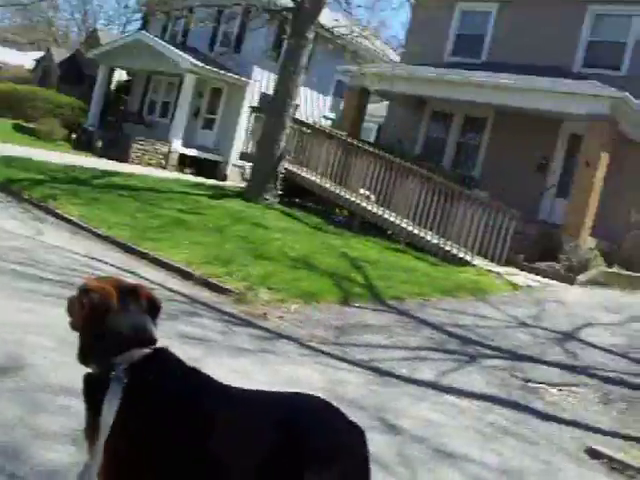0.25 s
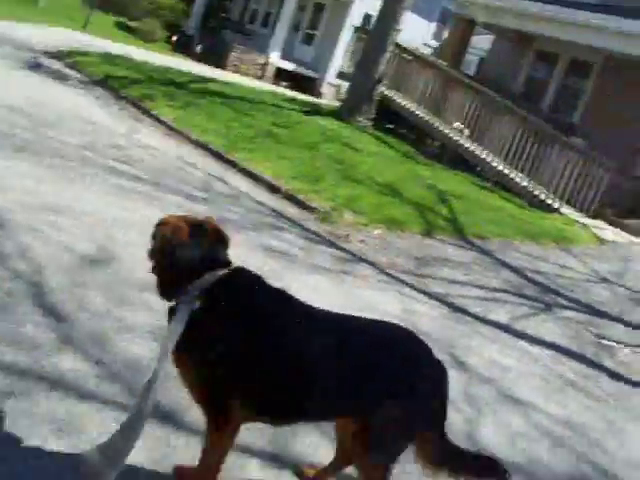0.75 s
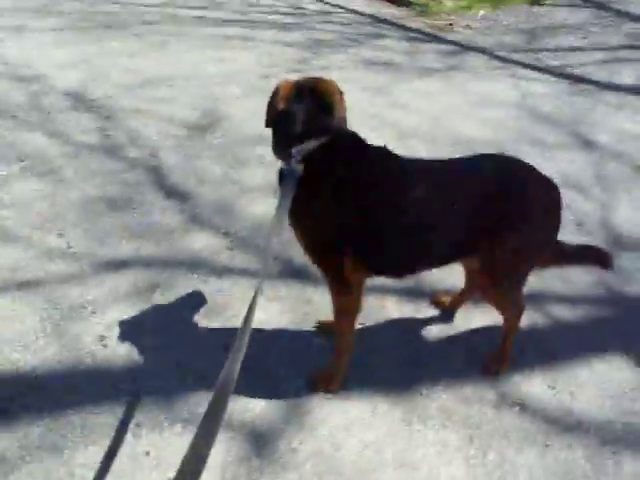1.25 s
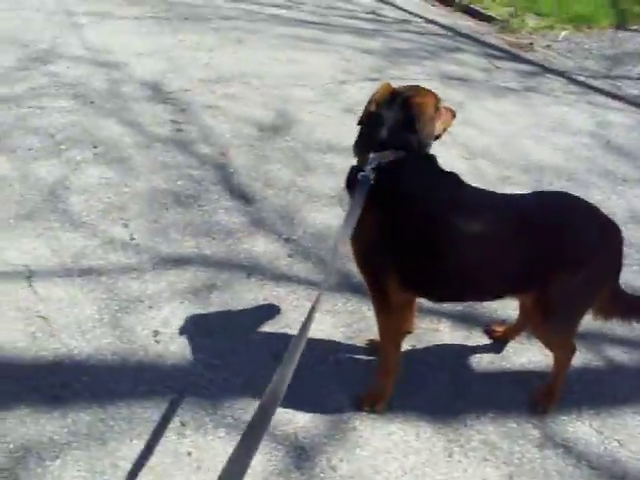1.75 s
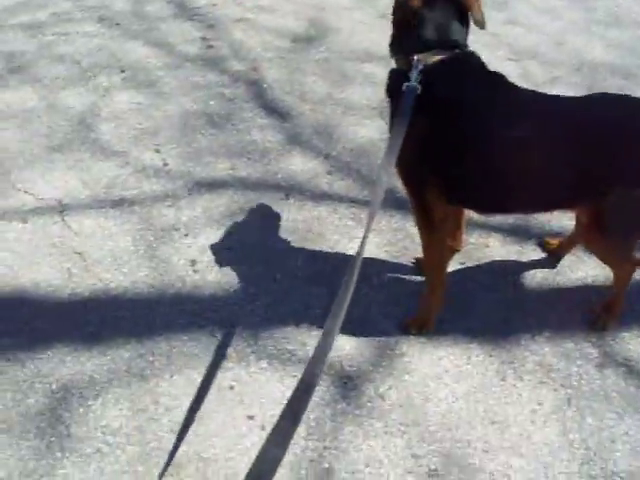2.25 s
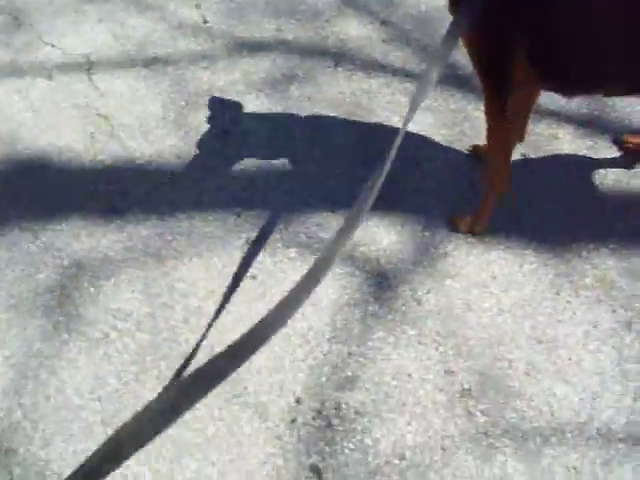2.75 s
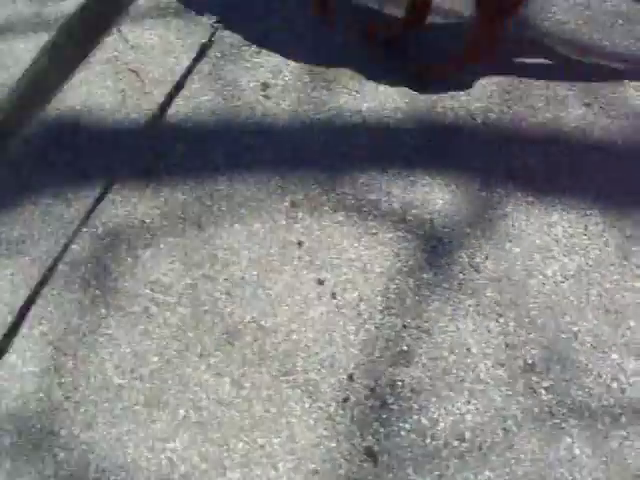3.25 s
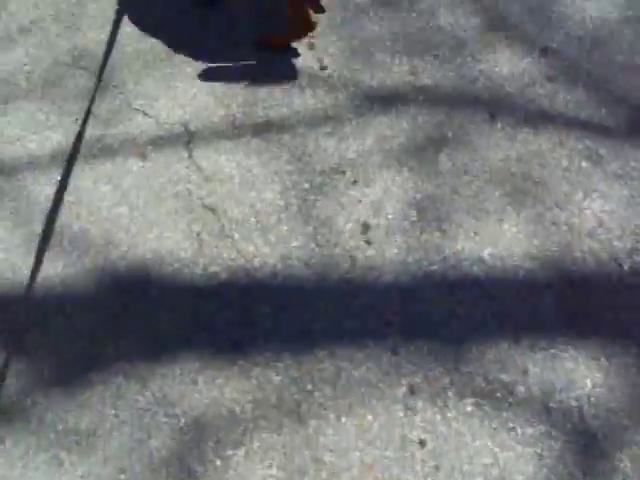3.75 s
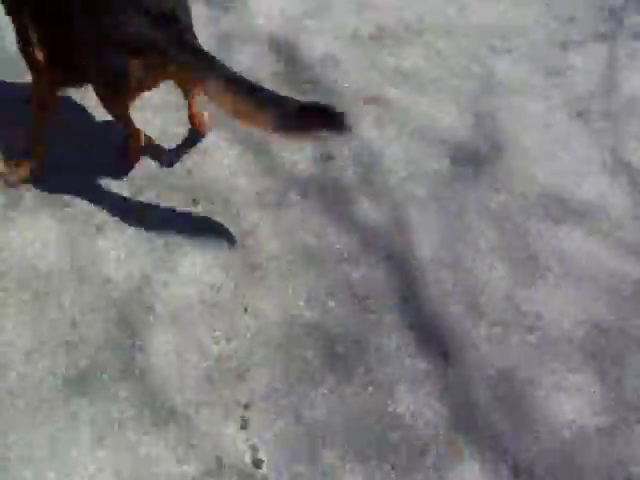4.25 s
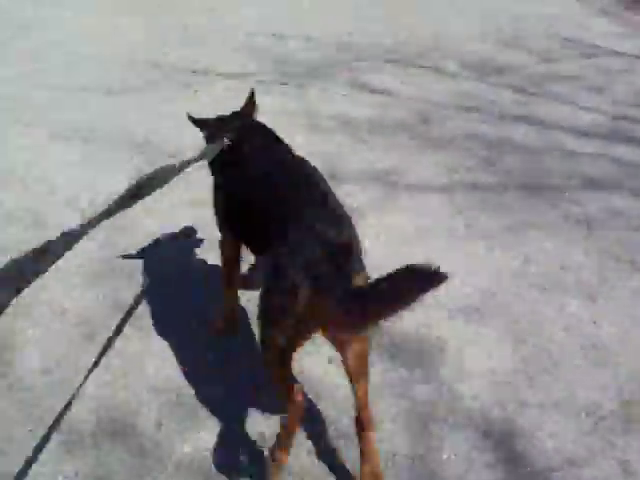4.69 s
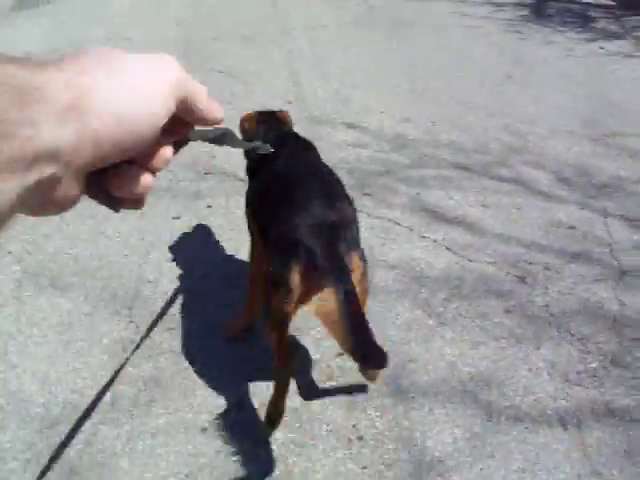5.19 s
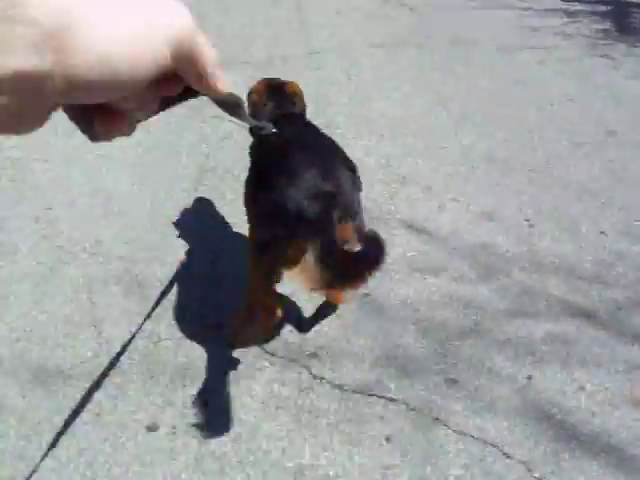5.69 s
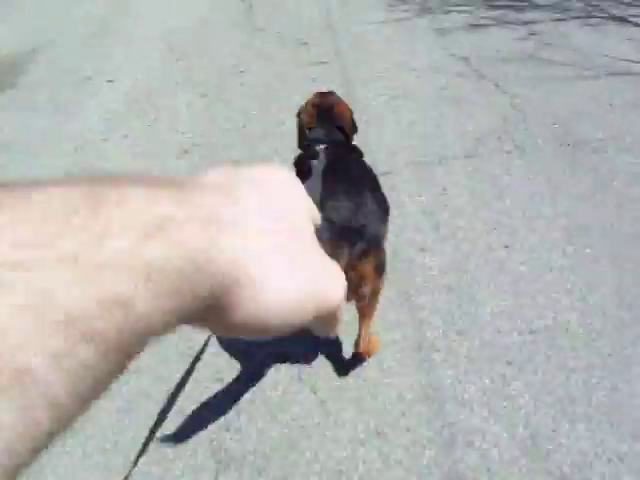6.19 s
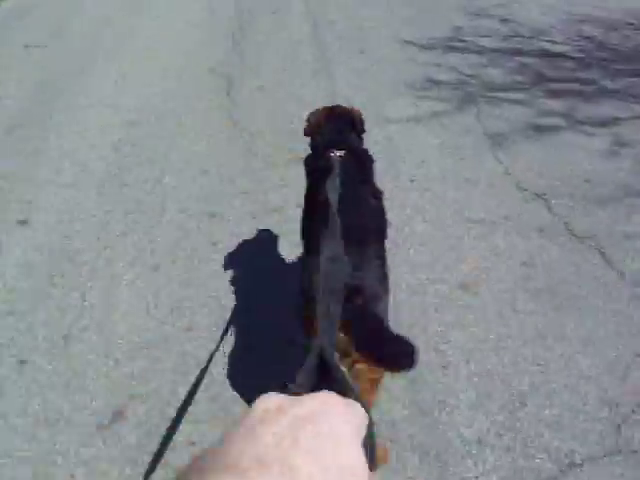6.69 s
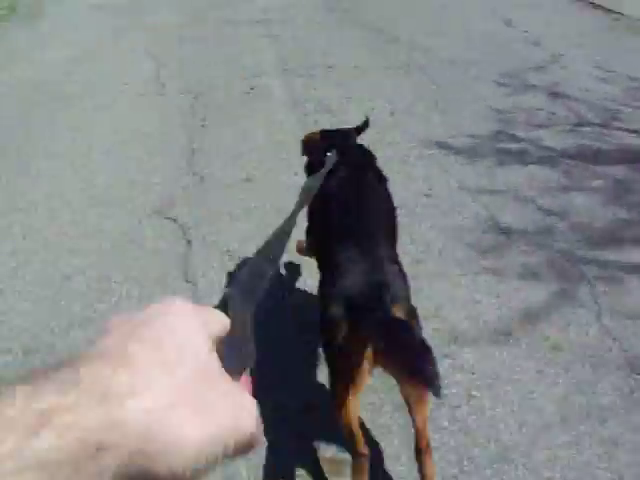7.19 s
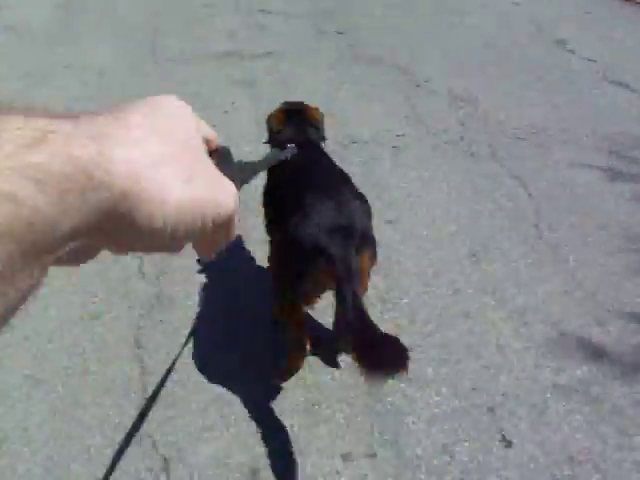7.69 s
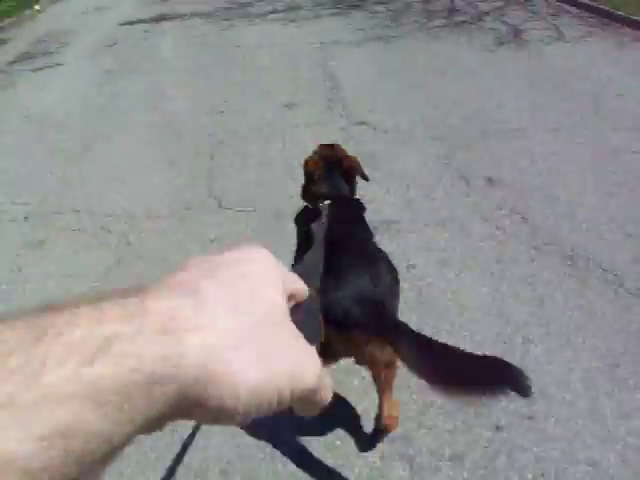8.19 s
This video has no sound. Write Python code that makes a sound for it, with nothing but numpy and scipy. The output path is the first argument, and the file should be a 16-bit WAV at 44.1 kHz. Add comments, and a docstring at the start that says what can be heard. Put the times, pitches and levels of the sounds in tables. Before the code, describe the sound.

Outdoor birdsong and leash rustle, a sharp skateboard clack on asphalt, shoe scuffs, then rough wheels accelerating with buffeting wind.

```python
"""Skateboard towed by a dog

Two songbirds whistle in gliding tones over soft street noise and the wavering hum of a distant engine.
Close to a hand-held camera, rubbed noise makes a leash rustle and short ringing tones make it click.
The board slaps down twice, with small bounces, as ringing deck tones and bursts of noise; a shoe scuffs.
Then tiny random impacts make the wheels grind over asphalt grit, louder with speed, and wind buffets."""
import sys
import numpy as np
from scipy import signal
from scipy.fft import rfft, irfft
from scipy.io import wavfile
from scipy.ndimage import uniform_filter1d

SR = 44100
rng = np.random.default_rng(int(sys.argv[2]) if len(sys.argv) > 2 else 0)


def store_wav(level_fs):
    """Save 16-bit WAV to argv[1]."""
    pcm = np.round(np.clip(np.atleast_2d(level_fs), -1, 1) * 32767)
    wavfile.write(sys.argv[1], SR, pcm.T.astype(np.int16))


N = 372204  # length of the scene in samples

# tone of fine rubbing, for the leash and for the tyre-like hiss of the wheels: f/Hz, level/dB
RUSTLE_COLOUR = [(400, 4.5), (1500, 7.5), (2600, 2), (3800, 2), (5200, -0.5), (6800, -1), (8500, 0.5)]
# the board slaps down, bounces and settles: t/s, level/dB, lowest bending tone under that load f/Hz,
# rattle level/dB, ring length (share of full length), slap level/dB; the last two levels are relative
LANDINGS = [(3.0055, -5, 309, -9.5, 0.73, 5), (3.047, -33, 328, 6, 1, -12), (3.071, -40, 333, -9, 0.94, -7),
            (3.106, -58, 330, 17.5, 0.68, 3), (3.122, -46.5, 328, 7.5, 1, -12),
            (3.1651, -8, 337.6, -16, 0.6, -23.5), (3.1693, -9.5, 315, -11, 0.12, -30.5),
            (3.187, -28, 360, -3.5, 0.32, -17)]
ROLL_START_S = 3.33


def undb(db):
    """Turn decibels into a gain."""
    return 10 ** (np.asarray(db) / 20)


def unit(x):
    """Scale a sound to an average (rms) level of 1."""
    return x / np.sqrt(np.mean(x ** 2))


def curves(table):
    """Draw straight lines between the rows of a table, giving each column at every sample."""
    s, *columns = np.transpose(table)
    return [np.interp(np.arange(N) / SR, s, column) for column in columns]


def since(start):
    """Stay silent before the start, then fade in over 0.28 s."""
    return np.clip((np.arange(N) / SR - start) / 0.28, 0, 1)


def add(out, start, sound):
    """Mix a sound in at a time in seconds, cutting off what falls outside the scene."""
    i = int(start * SR)
    a, b = max(i, 0), min(i + len(sound), N)
    if b > a:
        out[a:b] += sound[a - i:b - i]


def colour(x, points, size=4096):
    """Filter a sound to a spectrum of (Hz, dB) points, without any sound ahead of its cause."""
    hz, db = np.transpose(points)
    grid = np.maximum(np.arange(size // 2 + 1) * SR / size, 1)
    gain = undb(np.interp(np.log(grid), np.log(hz), db))
    # folding the cepstrum forward in time gives a minimum-phase filter
    cepstrum = irfft(np.log(gain))
    cepstrum[1:size // 2] *= 2
    cepstrum[size // 2 + 1:] = 0
    response = irfft(np.exp(rfft(cepstrum)))
    return signal.fftconvolve(x, response)[:len(x)]


def resonance(x, hz, width_hz):
    """Pick out a narrow band, with gain 1 at its centre."""
    return signal.lfilter(*signal.iirpeak(hz, hz / width_hz, fs=SR), x)


def walk(rate):
    """Wander smoothly at random, with rms 1 and about rate turns a second."""
    k = max(int(SR / rate), 1)
    steps = np.repeat(rng.standard_normal(N // k + 1), k)
    return unit(uniform_filter1d(steps, k)[:N])


def grains(rate, spread_db):
    """Scatter tiny random impacts, about rate a second, a few larger than the rest."""
    hit = rng.random(N) < rate / SR
    size = undb(spread_db * np.minimum(rng.exponential(size=N), 4))
    sign = rng.choice([-1, 1], N)
    return unit(hit * size * sign / np.sqrt(rate))


def plateaus(table, edge_s):
    """Make flat-topped rises with sloping edges from (s, length s, height) rows."""
    t = np.arange(N) / SR
    return sum(height * np.clip(.5 + np.minimum(t - s, s + length - t) / edge_s, 0, 1)
               for s, length, height in table)


def swell(count):
    """Rise and fall once, like half a sine wave."""
    return np.sin(np.linspace(0, np.pi, count))


def strokes(table):
    """Make pressure that swells and fades once for each (s, length s, dB) row."""
    pressure = np.zeros(N)
    for s, length, db in table:
        add(pressure, s, undb(db) * swell(int(length * SR)))
    return pressure


def pace():
    """Give the board's speed as a share of cruising speed; it sags and surges as the dog pulls."""
    # speed of the board: t/s, speed/(m/s)
    speed_points = [(3.5, 0.36), (3.85, 0.71), (4.35, 0.93), (4.63, 0.83), (4.85, 1.47), (5.12, 1.46),
                    (5.35, 2.24), (5.52, 2.23), (6.2, 3.16), (6.85, 3.2), (7.2, 2.91), (7.68, 3.4),
                    (7.86, 2.89), (8.12, 3.28), (8.44, 2.93)]
    cruise_m_s = 3
    return np.maximum(curves(speed_points)[0] / cruise_m_s, .01)


def street():
    """Filter noise into soft outdoor air and add two wavering harmonics of a distant engine."""
    # loudness of the outdoor noise, which drops after the board lands: t/s, level/dB
    air_levels = [(0, -43), (.6, -40.5), (1.1, -37), (2.4, -38), (3.0, -36.5), (3.04, -54.5), (3.22, -58),
                  (3.35, -62.5), (8.44, -67)]
    # tone of the outdoor noise: f/Hz, level/dB
    air_colour = [(12, -34), (20, -4.5), (90, -2), (164, -9), (437, -17.5), (903, -18), (1610, -25.5),
                  (1870, -24.5), (2860, -30), (3500, -28), (4490, -33.5), (7060, -40.5), (8000, -49),
                  (10400, -68), (17600, -120)]
    # engine hum: t/s, second harmonic relative level/dB, third harmonic relative level/dB
    engine_levels = [(0, -47, -47.5), (.3, -39.5, -54), (1.2, -34, -61), (1.75, -30.5, -40),
                     (1.95, -35, -46), (2.2, -27, -39), (2.45, -38.5, -37.5), (2.65, -33, -41.5),
                     (3.0, -60, -39), (3.06, -77, -72)]
    engine_hz = 43.5  # firing rate
    air_db, = curves(air_levels)
    air = unit(colour(rng.standard_normal(N), air_colour)) * undb(air_db + 1.3 * walk(5.9))
    second_db, third_db = curves(engine_levels)
    phase = 2 * np.pi * np.cumsum(engine_hz * (1 + 0.011 * walk(14))) / SR
    hum = undb(second_db) * np.sin(2 * phase) + undb(third_db) * np.sin(3 * phase)
    return air + np.sqrt(2) * hum * undb(-5.0 + 2 * walk(16))


def whistle(shape):
    """Glide a pure tone along (s, Hz, dB) points, with a small random shift of pitch."""
    s, hz, db = np.transpose(shape)
    t = np.arange(s[0], s[-1], 1 / SR)
    pitch = np.interp(t, s, hz) * (1 + 0.005 * rng.standard_normal())
    return np.sin(2 * np.pi * np.cumsum(pitch) / SR) * undb(np.interp(t, s, db))


def song():
    """Time a run of whistles that hurries a little and grows louder over its first notes."""
    note_count, start_s, gap_s, hurry_s_per_note = 12, -0.023, .1935, 0.00089
    song_db, soft_start_db, crescendo_s = -33.5, -8, 0.93
    k = np.arange(note_count)
    elapsed = k * (gap_s - hurry_s_per_note * k / 2)
    levels_db = song_db + soft_start_db * np.maximum(1 - elapsed / crescendo_s, 0)
    return zip(start_s + elapsed, levels_db)


def scatter(note, fade):
    """Spread a sound over many random paths whose strength follows a fade."""
    paths = fade * rng.standard_normal(len(fade))
    return signal.fftconvolve(note, paths / np.linalg.norm(paths))


def birds():
    """Sing rising whistles and a second bird's slurs, echoed by houses and scattered by trees and road."""
    # one rising whistle: t from mid sweep/s, f/Hz, relative level/dB
    sweep = [(-.075, 1680, -25), (-.056, 1750, -12.5), (-.036, 1810, -12.5), (-.024, 1950, -5),
             (-.012, 2220, -3.5), (-.005, 2600, -7.5), (0, 3060, -4), (.012, 3420, 2), (0.021, 3740, -4.5),
             (.027, 4100, -12)]
    # the second bird's short slurs: t/s, length/s, start f/Hz, end f/Hz, level/dB
    slurs = [(0.47, 0.021, 4450, 5380, -54), (0.49, 0.02, 4280, 5500, -49), (0.503, .036, 4630, 4200, -47),
             (0.577, 0.038, 3450, 2630, -46), (1.349, .05, 4390, 4050, -51),
             (1.649, 0.029, 3900, 2754, -41), (2.536, 0.022, 4640, 4080, -42)]
    # porches and house fronts that echo the birds: delay/s, relative level/dB
    houses = [(.011, -7.5), (.034, -7), (.083, -13)]
    # straight path, which weakens once the camera tips down to the road: t/s, relative level/dB
    direct_levels = [(0, -7), (.15, 2), (.55, 0), (.76, 3), (.95, 2.5), (1.12, -2), (1.7, -2), (2.1, -7)]
    note_spread_db, scatter_db, far_db = 1.5, -1, -14
    trees_t60_s, far_t60_s, house_t60_s = 0.08, 0.7, 0.035  # times to fade by 60 dB
    t = np.arange(SR // 2) / SR
    notes = []
    for s, db in song():
        gain = undb(db + note_spread_db * rng.standard_normal())
        notes.append((s + sweep[0][0], gain * whistle(sweep)))
    for s, length, start_hz, end_hz, db in slurs:
        slur = whistle([(0, start_hz, db), (length, end_hz, db)])
        notes.append((s, slur * swell(len(slur))))
    open_fade = undb(-60 * t / trees_t60_s) + undb(far_db - 60 * t / far_t60_s)
    house_fade = undb(-60 * t / house_t60_s)
    direct, echoes = np.zeros((2, N))
    for s, note in notes:
        add(direct, s, note)
        # the microphone moves, so each note arrives by a new set of near and far paths
        add(echoes, s, undb(scatter_db) * scatter(note, open_fade))
        for delay, db in houses:
            add(echoes, s + delay, undb(db) * scatter(note, house_fade))
    return direct * undb(curves(direct_levels)[0]) + echoes


def wind():
    """Buffet the microphone with low noise from eddies, harder with speed and in gusts."""
    # gusts on the microphone: t/s, length/s, extra level/dB
    gusts = [(4.5, 0.063, 14), (4.84, 0.37, 2), (5.32, 0.041, 6), (5.77, 0.079, 5.5), (6.17, 0.12, 5),
             (6.38, 0.15, 5.5), (6.62, 0.096, 6.5), (7.01, 0.074, 6), (7.72, 0.07, 5.5), (8.25, 0.031, 12)]
    # tone of the wind: f/Hz, level/dB
    wind_colour = [(15, -14.5), (35, 2), (70, 3.5), (110, 0.5), (200, -16), (500, -52.5)]
    cruise_db, growth_db = -25, 47  # level at cruising speed; growth per tenfold speed
    gust_edge_s = 0.019
    wind_db = cruise_db + growth_db * np.log10(pace()) + plateaus(gusts, gust_edge_s)
    eddies = unit(colour(rng.standard_normal(N), wind_colour))
    return eddies * undb(wind_db + 0.7 * walk(15)) * since(ROLL_START_S)


def leash():
    # the leash slides through the hand: t/s, length/s, level/dB, rasp f/Hz (set by the pull)
    rubs = [(0.171, 0.12, -48, 6000), (0.468, 0.15, -47.5, 1462), (0.71, 0.11, -38, 3500),
            (0.789, 0.3, -37, 2970), (0.918, 0.11, -43, 3430), (1.217, 0.22, -43.5, 1755),
            (2.408, 0.15, -39.5, 2700), (2.543, 0.19, -36.5, 3550), (2.696, 0.26, -51, 3900),
            (2.896, 0.17, -40, 1860), (5.124, 0.043, -45, 6900), (5.195, 0.14, -55, 5500),
            (5.57, 0.033, -40.5, 7100), (5.658, 0.18, -49, 6500)]
    # clicks: t/s, tone start level/dB, ring f/Hz, time to fade by 60 dB/s, relative scratch level/dB
    clicks = [(0.7234, -25.5, 3540, 0.033, 6.5), (0.7275, -7.5, 1210, 0.0054, 1),
              (0.7303, -17.5, 261, 0.021, -23), (0.7436, -16, 2200, 0.0033, -5),
              (.767, -13, 1276, 0.0048, -5), (0.772, -16.5, 132, 0.035, -23),
              (0.7796, -17.5, 670, 0.02, -6), (0.9251, -1.5, 400, 0.0086, -20),
              (.9265, -14.5, 620, 0.02, -27), (0.932, -19.5, 87, 0.1, -7), (0.959, -8.5, 1980, 0.0087, 5),
              (.988, -14, 1840, 0.0091, -2.5), (1.251, -33, 1910, .02, -5), (2.603, -30, 1205, 0.03, 4),
              (2.673, -29, 1650, 0.032, 1), (2.683, -30.5, 3810, 0.019, 8.5), (2.809, -27, 1630, 0.019, 5),
              (2.959, -31.5, 1990, .03, 1), (3.1076, -27, 1750, 0.012, -15), (4.57, -46.5, 4100, 0.011, 12),
              (4.812, -48, 5060, .008, 8), (4.868, -41.5, 3270, 0.0099, 8.5), (4.876, -45, 3270, .008, 6),
              (5.244, -44, 5000, .008, 6), (5.319, -42.5, 4500, .01, 11), (5.328, -42, 4550, 0.0063, 10),
              (5.58, -39, 4500, 0.0074, 12), (5.779, -41, 4700, 0.028, 11.5)]
    # tone of the scratch in a click: f/Hz, level/dB
    scratch_colour = [(100, -2.5), (700, -12), (1800, -3.5), (3300, 2), (6200, -3), (8000, -12)]
    sleeve_db, sleeve_start_s = -54, 0.53
    rasp_db, rasp_width_hz = 2, 590
    flicker_db, flicker_rate = 2.5, 90  # the webbing catches and slips; turns a second
    slips = unit(colour(grains(7000, 3.2), RUSTLE_COLOUR))
    # the sleeve brushes the camera faintly until the board is set down
    out = slips * undb(sleeve_db) * since(sleeve_start_s) * (1 - since(LANDINGS[0][0]))
    for s, length, db, hz in rubs:
        rub = slips[int(s * SR):int((s + length) * SR)]
        rasp = unit(rub + undb(rasp_db) * resonance(rub, hz, rasp_width_hz))
        add(out, s, undb(db) * rasp * swell(len(rub)))
    out = out * undb(flicker_db * walk(flicker_rate))
    t = np.arange(int(.08 * SR)) / SR
    for s, db, hz, t60, scratch_db in clicks:
        scratch = unit(colour(rng.standard_normal(len(t)), scratch_colour))
        tone = np.sin(2 * np.pi * hz * t)
        add(out, s, undb(db - 60 * t / t60) * (tone + 0.58 * undb(scratch_db) * scratch))
    return out


def shoe():
    """Drag the sole over rough ground in short swelling scrapes that set the deck humming."""
    # scuffs on road and grip tape: t/s, length/s, level/dB
    scuffs = [(0.81, 0.089, -40), (2.22, 0.21, -43.5), (2.88, 0.11, -40), (3.464, 0.016, -40.5),
              (3.47, 0.14, -47), (3.533, 0.026, -46), (3.596, 0.045, -41.5), (3.637, 0.035, -39.5),
              (3.667, 0.054, -37.5), (3.69, 0.2, -35), (3.86, 0.23, -49), (4.05, 0.33, -46.5)]
    # tone of a scuff: f/Hz, level/dB
    scuff_colour = [(80, -29.5), (300, -5), (500, -3), (750, 0), (1150, 4), (1550, -4), (2900, -12.5),
                    (3600, -22), (7500, -28)]
    grains_per_s, spread_db = 2400, 0.5  # sand grains that catch under the sole
    scrape = colour(grains(grains_per_s, spread_db), scuff_colour)
    humming = unit(scrape + 2.4 * resonance(scrape, 340, 30))
    return strokes(scuffs) * humming * undb(2.0 * walk(60))


def board():
    """Ring the deck at each landing or stone; landings also slap and rattle, and stones crunch."""
    # fixed ringing tones of deck and trucks: f/Hz, level/dB, full time to fade by 60 dB/s
    deck = [(190, -22.5, 0.2), (499, -4, 0.079), (554.5, -2.5, 0.099), (780, -17.5, 0.11),
            (1080, -16, 0.071), (1150, -17.5, 0.021), (1220, -20, 0.061), (1400, -24.5, 0.024),
            (1630, -24.5, .14), (1710, -24.5, 0.08), (2040, -31.5, 0.1), (2580, -33.5, 0.05)]
    # stones crack under the wheels and knock the deck: t/s, knock level/dB, crunch level/dB
    stones = [(3.469, -58, -39), (3.598, -54, -40), (3.668, -44, -37), (3.687, -48, -42), (3.723, -34, -29),
              (3.747, -35, -31), (3.772, -46, -37), (3.88, -42, -32), (3.896, -42, -29.5),
              (3.911, -27, -50), (3.948, -30, -50), (3.975, -26, -34), (3.999, -40, -32.5),
              (4.025, -45, -38), (4.053, -38, -35), (4.074, -38, -31.5), (4.145, -38, -38),
              (4.211, -38, -37), (4.221, -31, -29), (4.232, -20, -25), (4.241, -25, -28), (4.257, -22, -40),
              (4.32, -32, -40), (4.342, -22, -28.5), (4.371, -25, -36), (4.429, -38, -31.5),
              (4.497, -32, -36), (4.529, -37, -29.5), (4.885, -29, -42), (4.95, -33, -39),
              (5.023, -25, -54), (5.05, -29, -53), (5.092, -28, -52), (5.202, -38, -29),
              (5.226, -10.5, -27), (5.27, -19, -28), (5.832, -25, -33), (5.994, -12, -32),
              (6.059, -18, -40), (6.111, -13, -33), (6.133, -12, -26), (6.235, -11, -23), (6.297, -17, -24),
              (6.5, -4, -42), (6.542, -26, -23.5), (6.835, -15, -25), (6.853, -9.5, -19.5),
              (6.997, -13, -19), (7.061, -15, -26), (7.114, -20, -23), (7.157, -24, -26.5),
              (7.194, -24, -28), (7.305, -23, -20.5), (7.372, -9, -32), (7.421, -24, -21),
              (7.436, -22, -24), (7.481, -23, -28), (7.717, -10, -22), (7.763, -10, -38),
              (8.137, -19, -22.5), (8.227, -27, -20.5), (8.38, -30, -21.5)]
    # tone of the loose rattle: f/Hz, level/dB
    rattle_colour = [(150, -4.5), (400, 9), (900, 13.5), (1650, 3.5), (2500, 0.5), (4000, -21.5),
                     (7500, -28.5)]
    # tone of a crushed stone: f/Hz, level/dB
    stone_colour = [(150, -29.5), (450, 2.5), (1000, 8), (1450, 2), (1900, -4.5), (2300, -8), (3000, -15.5),
                    (4000, -27.5), (7000, -27.5)]
    bend_t60_s = 0.13
    second_ratio, second_db, second_t60_s = 2.17, -7.5, 0.13  # second bending tone, against the first
    slap_s, crack_db, crack_s = 0.0013, -35.5, 0.022  # bare wood and metal; then wheels on grit
    thud_hz, thud_db, thud_s = 278, 1.5, 0.0048
    loaded_bend_hz, loaded_length = 344, 0.2  # under the rider's weight; ring length as a share
    stone_peak_s = 0.0023  # a crunch peaks this long after contact
    t = np.arange(int(.4 * SR)) / SR
    out = np.zeros(N)

    def ring(bend_hz, length):
        """Sum two bending tones set by the load and the fixed tones of deck and trucks."""
        bends = [(bend_hz, 0, bend_t60_s), (second_ratio * bend_hz, second_db, second_t60_s)]
        total = 0
        for k, (hz, db, t60) in enumerate(bends + list(deck)):
            fade = undb(-60 * t / (t60 * length))
            total = total + undb(db) * np.sin(2 * np.pi * hz * t) * fade * (-1) ** k
        return total

    loose = unit(colour(grains(4400, 3.6), rattle_colour))
    for s, db, bend_hz, rattle_db, length, slap_db in LANDINGS:
        rattle = np.roll(loose, -int(s * SR))[:len(t)] * undb(rattle_db - 60 * t / (0.16 * length))
        # a hard slap at contact, then the wheels crack against the grit
        crack_fade = undb(slap_db) * np.exp(-t / slap_s) + undb(crack_db) * np.exp(-t / crack_s)
        crack = rng.standard_normal(len(t)) * crack_fade
        add(out, s, undb(db) * (ring(bend_hz, length) + rattle + crack))
    # the whole board thuds under its first, full drop
    thud = undb(thud_db) * np.sin(2 * np.pi * thud_hz * t) * np.exp(-t / thud_s)
    add(out, LANDINGS[0][0], thud)
    knock = ring(loaded_bend_hz, loaded_length)
    crush = np.zeros(N)
    crush_shape = t / stone_peak_s * np.exp(1 - t / stone_peak_s)
    for s, knock_db, crunch_db in stones:
        add(out, s, undb(knock_db) * knock)
        add(crush, s, undb(crunch_db) * crush_shape)
    out = out + crush * unit(colour(grains(6000, 1.4), stone_colour))
    # a plank this small radiates no deep bass
    return signal.sosfilt(signal.butter(3, 115, "high", fs=SR, output="sos"), out)


def wheels():
    """Drum grit on the wheels and shake the deck; all layers grow with speed and on coarse patches."""
    # coarse patches of asphalt: t/s, length/s, extra crunch level/dB
    patches = [(3.7, 0.92, 17.5), (4.21, 0.054, 10), (5.19, 0.11, 9.5), (5.66, 0.19, 2), (6.1, 0.11, 4.5),
               (6.4, 0.13, 2.5), (6.94, 0.12, 3.5), (7.37, 0.13, 5), (7.69, 0.046, 6), (8.2, 0.059, 7)]
    # tone of the rumble through wheels and deck: f/Hz, level/dB
    rumble_colour = [(53, -29), (90, -14), (136, 0), (237, 2), (445, -4), (572, 1), (643, -3), (778, -4.5),
                     (875, -14), (1010, -11), (1120, -24), (1320, -27), (1600, -30), (3000, -53.5),
                     (3900, -78), (6600, -120)]
    # tone of crushed grit: f/Hz, level/dB
    crunch_colour = [(80, -49.5), (500, -10), (800, -7.5), (1000, 6.5), (1160, -2.5), (1350, 5.5),
                     (1650, -1), (2050, -7), (2300, -17), (3400, -35), (7000, -36)]
    # level/dB at cruising speed, and growth/dB per tenfold speed
    rumble_db, rumble_growth_db = -19, 43.5
    crunch_db, crunch_growth_db = -38.5, 53.5
    hiss_db, hiss_growth_db = -48.5, 28.5
    rumble_share, hiss_share, patch_edge_s = 0.45, 0.41, 0.071  # shares of a patch's extra dB
    pebbles_per_s, pebble_spread_db, chatter_s = 110, 0.4, 0.0028  # rate at cruising speed
    grit_mix_db, pebble_mix_db, spit_mix_db = -1, -5.5, -12
    cluster_db, cluster_rate = 1.5, 16  # the grit lies in clusters; turns a second
    speed = pace()
    decades = np.log10(speed)
    coarse_db = plateaus(patches, patch_edge_s)
    texture = walk(55)  # small changes of grain in the road

    body = colour(grains(5000 * speed, 1.92), rumble_colour)
    # the deck sings at one bending tone and has a dead band an octave higher
    body = body + 0.57 * resonance(body, 556.0, 22) - 1.1 * resonance(body, 1120, 110)
    rumble_level = rumble_db + rumble_growth_db * decades + rumble_share * coarse_db + 0.83 * texture
    rumble = unit(body) * undb(rumble_level)

    grit = unit(colour(grains(3500 * speed, 2.4), crunch_colour))
    # larger pebbles each set the trucks chattering, brighter than the grit, for a few milliseconds
    pebbles = np.abs(grains(pebbles_per_s * speed, pebble_spread_db))
    chatter = unit(signal.lfilter([1], [1, -np.exp(-1 / (chatter_s * SR))], pebbles))
    ticks = chatter * unit(grit + 1.9 * resonance(grit, 2640, 530))
    crunch = undb(grit_mix_db) * grit + undb(pebble_mix_db) * ticks
    crunch_level = crunch_db + crunch_growth_db * decades + coarse_db + 0.5 * texture
    crunch = crunch * undb(crunch_level + cluster_db * walk(cluster_rate))

    # the treads peel off the road with a fine hiss that spits at each pebble
    fine = colour(grains(9000, 5.7), RUSTLE_COLOUR)
    peel = unit(fine * (1 + undb(spit_mix_db) * chatter))
    hiss = peel * undb(hiss_db + hiss_growth_db * decades + hiss_share * coarse_db + 0.6 * texture)
    return (rumble + crunch + hiss) * since(ROLL_START_S)


def scene():
    """Add all sources at the one microphone."""
    return (street() + birds() + wind() + leash() + shoe() + board() + wheels())[None]


def record(dry):
    """Round the peaks, remove the high treble, then clip overloads, which splash above that band."""
    soft_limit, overload = 1.15, .71  # sample values
    band_hz, top_hz = 7700, 16000
    rounded = soft_limit * np.tanh(dry / soft_limit)
    narrow = signal.sosfilt(signal.butter(18, band_hz, fs=SR, output="sos"), rounded)
    clipped = np.clip(narrow, -overload, overload)
    return signal.sosfilt(signal.ellip(8, .2, 70, top_hz, fs=SR, output="sos"), clipped)


dry = scene()
out = record(dry)
store_wav(out)
```